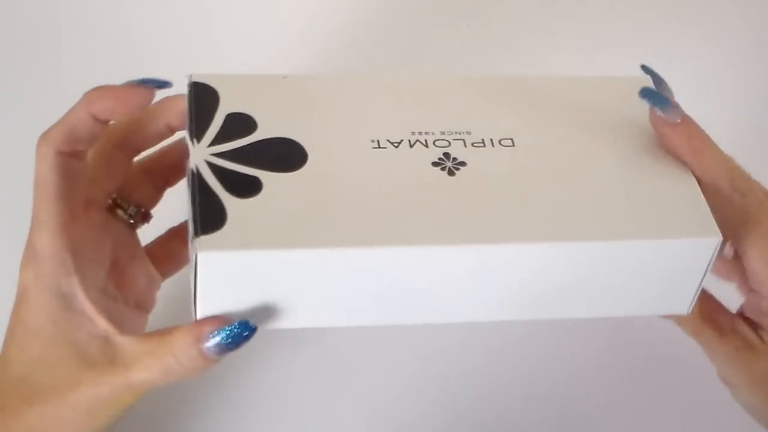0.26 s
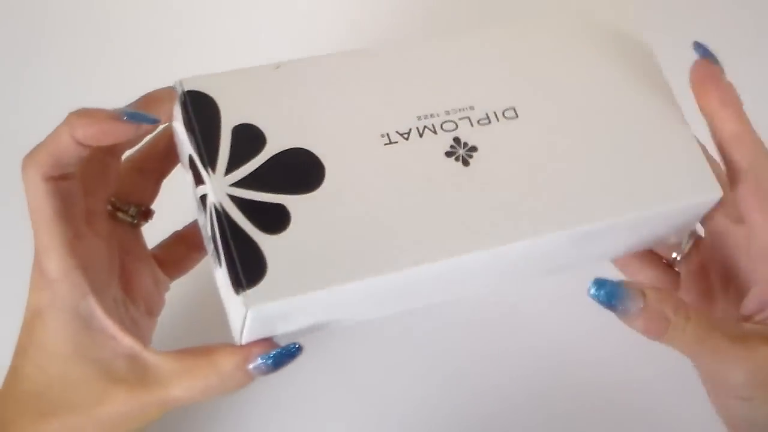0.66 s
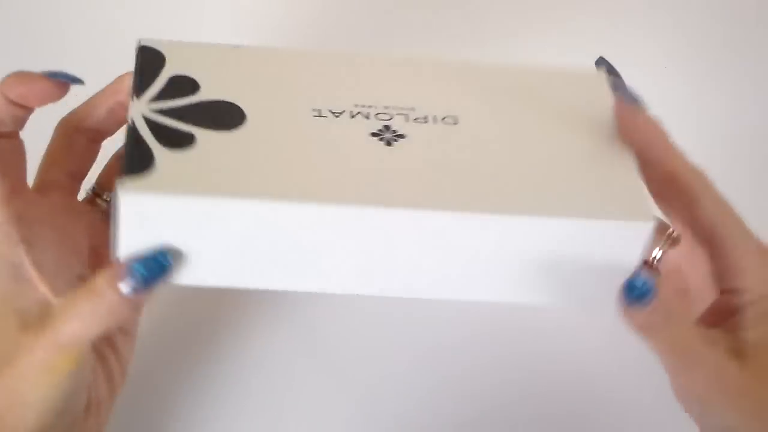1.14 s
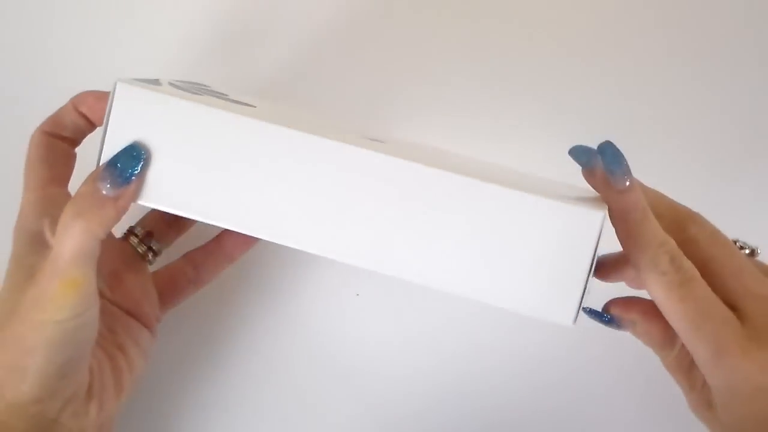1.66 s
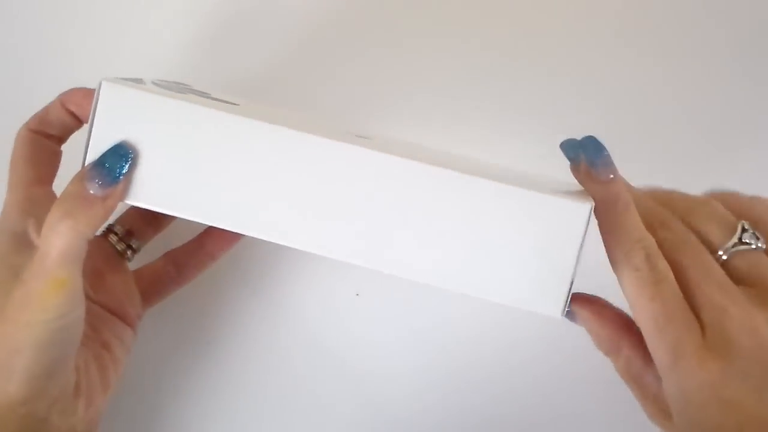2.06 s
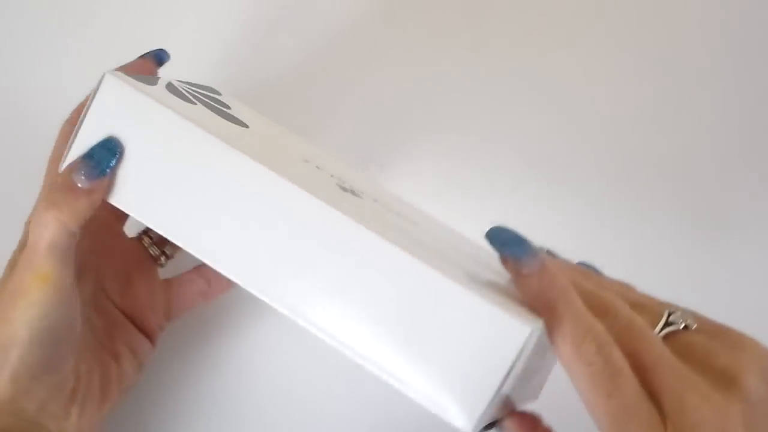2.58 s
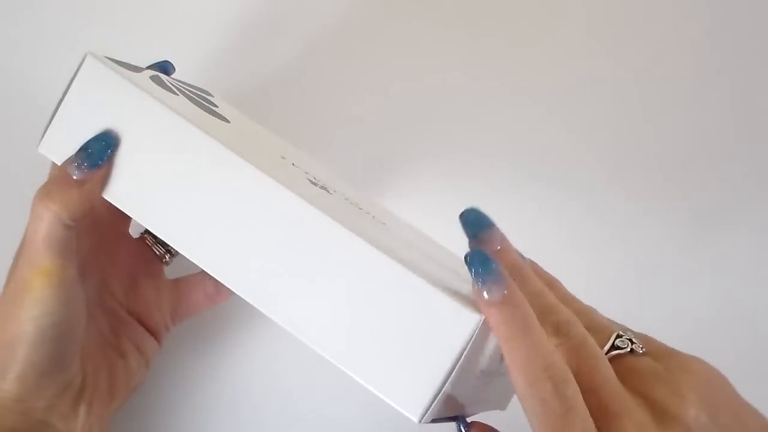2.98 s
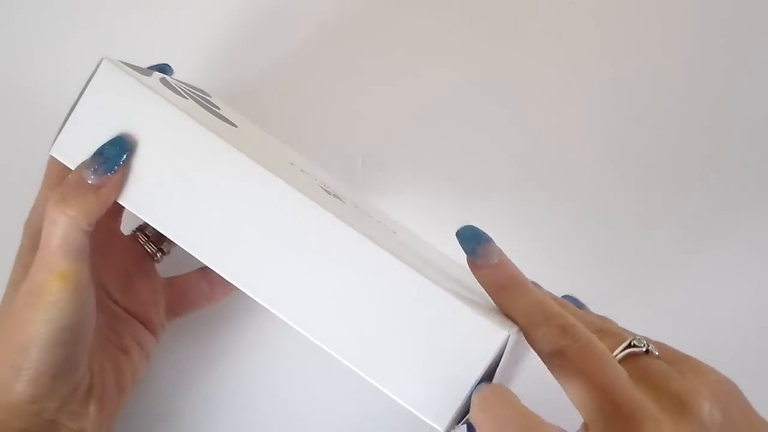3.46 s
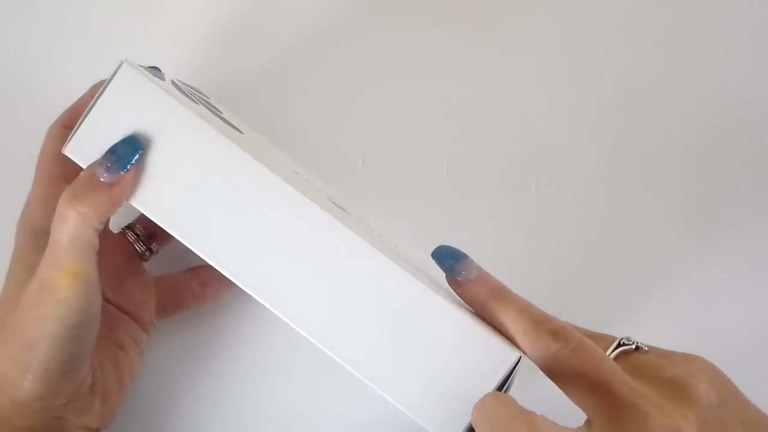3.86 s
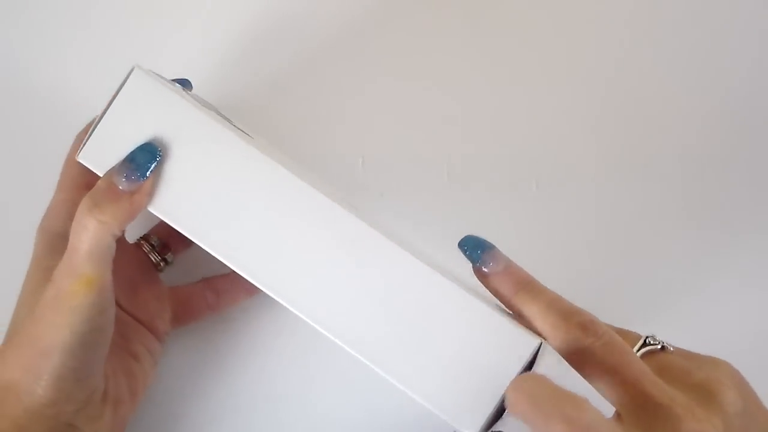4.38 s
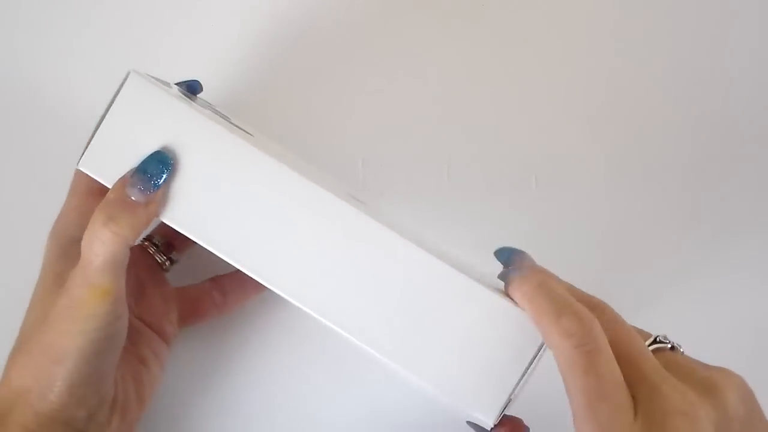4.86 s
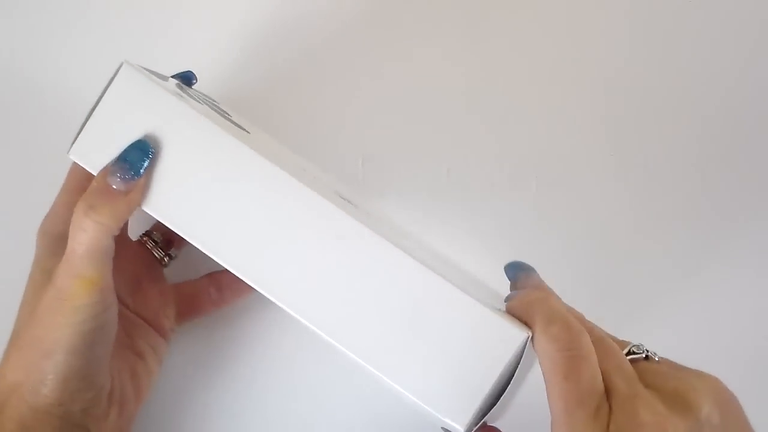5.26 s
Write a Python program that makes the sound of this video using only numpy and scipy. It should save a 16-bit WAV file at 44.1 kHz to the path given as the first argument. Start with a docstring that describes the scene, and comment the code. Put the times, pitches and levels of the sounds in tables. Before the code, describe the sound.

A stiff hollow card box is handled close to a stereo microphone in a small quiet room. Faint nail ticks and soft skin rubs begin sparsely, with a clear click at about 0.55 s and a sharper, hollower one near 1.36 s. From 1.5 to 2.4 s there are mostly faint touches and soft low finger thumps. Two strong papery snaps follow at 2.5 and 2.6 s, then light rubbing. At about 3.42 s the flap pops loose with a quick double, hollow clack. Clicks resume at 3.9 s and cluster between 4.3 and 4.65 s. From 4.73 to 4.95 s the flap is prised in a dense crackle with two very short creaks, peaking in the loudest, sharp snap at 4.91 s. Thin ticks, lower snaps and rubs continue to the end, notably at 5.4 s. Reflections are short; faint hiss and a low wavering hum lie beneath.

```python
"""In a small room, a stiff card box is held close to a pair of microphones while long nails tap it and pick at its flap.
Each contact is a noise burst through card and wall resonances, with a thump from decaying modes of the hollow box.
Rubbing skin is noise with tiny catches; the flap pops loose, and uneven pulses make it creak as it is prised open.
A gain control turns loud snaps down and recovers slowly; steady noise and a low wavering hum lie beneath."""
import sys
import numpy as np
from scipy import signal
from scipy.fft import rfft, irfft, next_fast_len
from scipy.io import wavfile
from scipy.ndimage import uniform_filter1d, minimum_filter1d

SR = 44100
rng = np.random.default_rng(int(sys.argv[2]) if len(sys.argv) > 2 else 0)


def put_to_file(sound):
    """Save the sound as 16-bit audio at rate SR, in the file named by the first command-line argument."""
    columns = np.atleast_2d(sound).T  # one column per channel
    safe = np.clip(columns, -1, 1)
    whole_steps = np.round(safe * 32767)
    wavfile.write(sys.argv[1], SR, whole_steps.astype(np.int16))


N = 243873
T = np.arange(N) / SR  # time [s]

# nail taps and snaps of the card: (time [s], strength [dB], ring [Hz],
# hollow thump re strength [dB], sharp edge re strength [dB])
TAPS = [(0.2533, -47.5, 2820, 5, -4), (0.269, -50.5, 2660, -8, -12), (0.4023, -49, 3250, -26, -12),
        (.5490, -30, 2730, -11, -11.5), (0.7965, -42, 2780, -14, -8), (1.072, -51.5, 2380, -24, -21),
        (1.202, -40, 2800, -28, -16), (1.2086, -43.5, 3100, -18, -19), (1.306, -40.5, 2700, -5.5, -28),
        (1.3604, -31.5, 3000, -1, -0.5), (1.4655, -47.5, 2480, -9, -10), (1.526, -46, 2320, -8, -21),
        (1.6125, -50.5, 1830, -13, -16), (1.9984, -51, 3320, -8, -9), (2.0704, -51, 3000, -16, -29),
        (2.3428, -44, 2860, -7.5, -5.5), (2.393, -51.5, 2880, 1.5, -19), (2.509, -24.5, 2230, -15, -6.5),
        (2.6067, -29, 2090, -13, -8.5), (2.9344, -39, 1930, -12, -23), (2.967, -49, 2940, -2.5, 0),
        (3.1043, -47, 3700, -8, -5), (3.3112, -36, 2650, -11.5, -5.5), (3.421, -28.5, 2690, -4.5, -8),
        (3.8389, -41.5, 2840, -12, -15.5), (3.9349, -33, 3650, -13, -7), (4.0272, -43.5, 2270, -11, -10),
        (4.0407, -45, 2500, -5, -10), (4.28, -33, 2970, -13.5, -10.5), (4.3636, -31.5, 2800, -8.5, -11.5),
        (4.3902, -37, 2680, -8.5, -14), (4.4337, -33.5, 3780, -13, -8.5), (4.5248, -31, 3380, -14.5, -8.5),
        (4.6331, -37.5, 2850, -10.5, -7), (4.7549, -31, 2610, -25, -11.5), (4.763, -35, 2490, -9, -9),
        (4.7882, -38, 2950, -6.5, -8), (4.8005, -37.5, 3440, -20, -1.5), (4.8065, -44, 3480, -12, 7.5),
        (4.8543, -35.5, 1550, -5.5, -5), (4.8660, -31.5, 1500, -20.5, -7.5), (4.8718, -45, 1690, -3, -2),
        (4.9034, -33.5, 3540, -34, -12), (4.9093, -16.5, 2260, -26, -9), (4.9186, -31.5, 3300, -5.5, -1.5),
        (5.0568, -43.5, 2725, -22, 0), (5.0616, -41.5, 1700, 3, -6), (5.081, -35, 3520, -30, -5),
        (5.0914, -37.5, 3460, -19, -6), (5.107, -42, 3460, -30, -2), (5.171, -42, 3520, -20, -2.5),
        (5.2316, -37, 3420, -32, 0), (5.2415, -33.5, 1560, -17, -8), (5.34, -45.5, 1600, 3, -16),
        (5.3473, -43, 1800, 2, -12), (5.3703, -39, 2500, -10, -10), (5.381, -39, 3000, -11, -8),
        (5.396, -26.5, 1470, -12.5, -10.5), (5.4369, -29, 1730, -30, -4.5), (5.4797, -37.5, 1700, -10, -15),
        (5.4938, -41, 2400, -14, -19), (5.5002, -42.5, 2320, -6, -18)]
# soft finger pads landing on the box: (time [s], relative level [dB], pitch [Hz])
PADS = [(0.244, -64, 356), (0.549, -54, 197), (1.492, -47, 367), (2.015, -49, 397), (2.487, -63, 334),
        (2.854, -48, 357), (3.424, -46.5, 257), (4.034, -47, 160), (4.07, -44.5, 151.5), (5.058, -51, 360)]
# a finger rubs along the card: (time [s], length [s], relative level [dB],
# hiss re that level [dB], pitch of the card under the finger [Hz])
RUBS = [(0, 0.033, -57.5, 2, 2980), (0.252, 0.067, -60, -0.5, 2700), (0.423, 0.054, -51.5, -11, 2600),
        (0.512, 0.098, -54.5, -9, 2300), (0.735, 0.16, -58.5, -10, 2660), (1.152, 0.048, -49, -10.5, 1550),
        (1.207, 0.048, -48, -2, 3000), (1.267, 0.14, -55.5, 0.5, 2630), (1.481, 0.067, -54.5, -10, 2400),
        (1.615, 0.04, -57, -11, 1900), (1.744, 0.016, -60, -15, 2570), (2.001, 0.061, -61.5, -21, 2960),
        (2.321, 0.086, -57, -8, 2970), (2.481, .03, -57, -7, 2600), (2.547, 0.17, -55.5, -7, 2600),
        (2.78, 0.092, -57, 0.5, 3540), (3.146, 0.052, -57.5, -8, 2800), (3.293, 0.25, -54, -6, 2820),
        (3.554, 0.21, -56.5, -10, 1880), (4.028, .03, -48.5, -18, 2260), (4.316, .05, -57, -12, 2800),
        (4.508, .11, -53, -8, 2750), (4.753, 0.094, -44, -11, 2580), (4.86, 0.054, -46, -9, 1500),
        (5.077, .05, -47.5, 1, 3400), (5.244, 0.039, -39, -13, 1490), (5.383, 0.13, -46, -15.5, 1540)]
# the flap springs loose and slaps back: (time [s], level [dB])
FLAP_POPS = [(3.423, -31.5), (3.4387, -35)]
# the tight flap sticks and slips: (time [s], time until it gives [s], initial slip rate [Hz], level [dB])
CREAKS = [(4.729, .024, 904.5, -34), (4.8474, .021, 478, -36)]
# modes of the hollow box: (frequency [Hz], relative level [dB], t60 [s])
BOX_MODES = [(223, -16, 0.13), (276, -39, 0.02), (357, 14.5, 0.059), (421.9, 9, 0.11), (518, -6.5, 0.21)]
# modes of the flap: (frequency [Hz], relative level [dB], t60 [s])
FLAP_MODES = [(172, -30, .25), (206, -6, 0.45), (355, -11, 0.25), (473, -19, 0.049), (520, 2, 0.12),
              (573, -1, 0.061), (612, 9.5, 0.17), (680, 8, 0.074), (835, -7, 0.11), (930, -4, 0.15),
              (1137, 2, 0.048), (1430, -10, .1)]
# bending resonances of the walls: (frequency [Hz], width [Hz], relative level [dB])
WALL_MODES = [(528, 59, -1.5), (750, 66, 0.5), (937, 180, -1.5), (1130, 176, 1.5), (1271, 130, -1),
              (1497, 160, 0.5)]
# stiff ripples of the card near its folds: (frequency [Hz], width [Hz], relative level [dB])
FOLD_MODES = [(2327, 100, -0.5), (2595, 73, 3), (2820, 27, -6), (3420, 82, -8.5), (4016, 55, 2)]
# resonances of the lifted flap: (frequency [Hz], width [Hz], relative level [dB])
LIFTED_MODES = [(875, 400, -9.5), (1430, 130, 3), (1630, 160, 1.5), (2680, 200, -0.5), (3020, 590, -6.5)]
# spectrum of the cracking card: (frequency [Hz], relative level [dB])
CARD_SPECTRUM = [(700, -11.5), (1300, 1.5), (1800, 6), (2600, 2.5), (3700, 5), (4600, -3.5), (6000, -4),
                 (14000, -39.5)]
# spectrum of the sharp nail edge: (frequency [Hz], relative level [dB])
EDGE_SPECTRUM = [(2500, -66), (4500, 2.5), (5500, 1), (7500, -1.5), (9000, -2.5), (10500, -3),
                 (14000, -9.5)]
# spectrum of sliding skin: (frequency [Hz], relative level [dB])
SKIN_SPECTRUM = [(300, -39), (700, -1), (1100, -8), (1600, -0.5), (2200, -1), (3000, 5), (4000, 2.5),
                 (5500, 0), (8000, -9), (14000, -49)]
# spectrum of the rubbing hiss: (frequency [Hz], relative level [dB])
HISS_SPECTRUM = [(2500, -6.5), (5000, 8.5), (7000, 6), (11000, 2), (14000, -2.5)]
# spectrum of the room's reflections: (frequency [Hz], relative level [dB])
ROOM_SPECTRUM = [(100, -14.5), (350, 3.5), (800, 1.5), (1500, -1.5), (3000, -6.5), (6000, -1.5),
                 (14000, -3)]
# spectrum of the steady background noise: (frequency [Hz], relative level [dB])
FLOOR_SPECTRUM = [(20, -4), (36, -8.5), (70, -11.5), (110, -16), (148, -9.5), (190, -13.5), (270, -17),
                  (350, -24), (430, -21.5), (520, -17.5), (700, -24.5), (1000, -25.5), (1300, -27),
                  (2200, -27.5), (3000, -28), (4600, -31), (14000, -36)]
# low hum: (frequency [Hz], rms level [dB])
HUM = [(26.2, -58.5), (50, -65.5)]

LIFTED_S = 4.7  # from this time the flap stands free
# wall flex re strength; a lower ring comes from further inside a wall and bends it more
FLEX_SHUT_DB, FLEX_LIFTED_DB, FLEX_DB_PER_OCTAVE, FLEX_REF_HZ = -9.5, -6, -2, 2700
# the card's second bending mode: ratio to the ring pitch, level, t60 as the finger damps it
OVERTONE_RATIO, OVERTONE_DB, OVERTONE_T60_S = 1.584, -2.5, 0.051
# a glancing nail has less edge, stays longer on the card and rings it more purely:
# edge of a square hit, and the fall of edge that doubles both
SQUARE_EDGE_DB, GLANCE_DB = -10.5, 11
TICK_DB, TICK_SCATTER_DB = -6.5, 0.5  # faint nail tick in each rub: level re the rub, scatter
RUB_ATTACK_S, RUB_RELEASE_S = 0.0085, 0.013  # linear rise; time constant of the fade
RUB_RING_SHARE, RUB_RING_WIDTH_HZ = 0.44, 730  # the card's ring under the rubbing finger
HOLD_DB, HOLD_HISS_DB = -65, -5.5  # the holding hand never rests: relative level; its hiss re that level
RUB_DRUM_DB, HOLD_DRUM_DB = -7.5, -1.5  # drumming of the box re the friction
CREAK_ATTACK_S, CREAK_RELEASE_S = .007, 0.012  # time constants
CREAK_SAG = 0.39  # share of the slip rate that is lost as the flap gives
CREAK_TOP_HZ = 4200  # the rounded slips carry little above this
LIMIT_DB, TOP_HZ = -11.5, 14250  # gain control threshold; upper band limit


def taps():
    """Impact excitation: clear taps and snaps, and a faint nail tick somewhere in each rub."""
    out = np.zeros(N)
    for s, db, ring_hz, thump_db, edge_db in TAPS:
        add(out, s, undb(db) * contact(s, ring_hz, thump_db, edge_db))
    for start, length, db, _, ring_hz in RUBS:
        s = start + length * rng.random()
        tick_db = db + TICK_DB + TICK_SCATTER_DB * rng.standard_normal()
        add(out, s, undb(tick_db) * contact(s, ring_hz, thump_db=-16, edge_db=1))
    return out


def contact(s, ring_hz, thump_db, edge_db, flap_share=0.44):
    """Superposition: a contact rings the card near the nail, flexes the walls and thumps the air inside."""
    glance = 2 ** (max(SQUARE_EDGE_DB - edge_db, 0) / GLANCE_DB)
    burst = crack(t60=0.0089 * glance, linger_db=-30.0, linger_t60=.15, rise_s=0.00085)
    card = folds(colour(burst, CARD_SPECTRUM))
    overtone = resonate(card, ring_hz * OVERTONE_RATIO, width_hz=270)
    overtone = overtone * undb(-60 * T[:len(card)] / OVERTONE_T60_S)
    card = 0.57 / glance * card + resonate(card, ring_hz, width_hz=730) + undb(OVERTONE_DB) * overtone

    flex = walls(crack(t60=0.0055, linger_db=-25, linger_t60=0.094, rise_s=0.00051))
    flex_db = FLEX_SHUT_DB
    if s > LIFTED_S:  # the free flap rings along
        card = card + 0.53 * lifted(card)
        flex = flex + flap_share * lifted(flex)
        flex_db = FLEX_LIFTED_DB
    flex_db = flex_db + FLEX_DB_PER_OCTAVE * np.log2(ring_hz / FLEX_REF_HZ)

    edge = colour(crack(t60=0.0054, linger_db=-24, linger_t60=0.084, rise_s=0.00054), EDGE_SPECTRUM)
    thump = ring(BOX_MODES, scatter=0.022)
    return blow(card) + undb(flex_db) * blow(flex) + undb(edge_db) * blow(edge) + undb(thump_db) * thump


def crack(t60, linger_db, linger_t60, rise_s):
    """Scattering of bending waves in the card: a dense burst with a weaker shiver that outlasts it."""
    t = T[:SR // 4]
    decay = undb(-60 * t / t60) + undb(linger_db - 60 * t / linger_t60)
    envelope = (1 - np.exp(-t / rise_s)) * decay
    return even(rng.choice([-1, 1], len(t)) * envelope)


def folds(x, share=0.72):
    """Local resonance: the folds add narrow rings to a sound that passes through the card."""
    return x + share * sum(undb(db) * resonate(x, hz, width) for hz, width, db in FOLD_MODES)


def walls(x):
    """Plate resonance: bending modes of the card walls, with alternating sign."""
    return sum((-1) ** k * undb(db) * resonate(x, hz, width) for k, (hz, width, db) in enumerate(WALL_MODES))


def lifted(x):
    """Resonance of a free plate: the flap once it stands open."""
    return sum(undb(db) * resonate(x, hz, width) for hz, width, db in LIFTED_MODES)


def ring(modes, scatter):
    """Modal decay: fading sines; the grip shifts their pitch a little at every blow."""
    t = T[:SR // 4]
    out = np.zeros(len(t))
    for hz, db, t60 in modes:
        shifted_hz = hz * (1 + scatter * rng.standard_normal())
        out += undb(db - 60 * t / t60) * np.sin(2 * np.pi * shifted_hz * t)
    return blow(out)


def flap():
    """Sudden release and stick-slip: the flap pops loose, then creaks as it is prised open."""
    out = np.zeros(N)
    for s, pop_db in FLAP_POPS:
        clatter = blow(walls(crack(t60=0.031, linger_db=-9, linger_t60=0.13, rise_s=0.001)))
        add(out, s, undb(pop_db) * (ring(FLAP_MODES, scatter=0.0061) + 0.64 * clatter))
    for s, gives_s, slip_hz, db in CREAKS:
        add(out, s, undb(db) * creak(gives_s, slip_hz))
    return out


def creak(gives_s, slip_hz):
    """Stick-slip: slips of card on card ring the flap; they swell, then slow down and fade as it gives."""
    t = T[:SR // 8]
    hz = slip_hz * (1 - CREAK_SAG * (1 - 1 / (1 + (t / gives_s) ** 4.5)))
    envelope = (1 - np.exp(-t / CREAK_ATTACK_S)) * np.exp(-np.maximum(t - gives_s, 0) / CREAK_RELEASE_S)
    jitter = unit(uniform_filter1d(rng.standard_normal(len(t)), size=60))
    # the slower the slips, the less regular they are
    unevenness = np.clip(.05 + .7 * (1 - hz / 900), 0, .25)
    cycles = np.cumsum(hz * (1 + unevenness * jitter)) / SR
    slips = np.diff(np.floor(cycles), prepend=0)  # one pulse per whole cycle
    slips = slips * undb(2.4 * rng.standard_normal(len(t)))
    slips = signal.sosfilt(signal.butter(2, CREAK_TOP_HZ, fs=SR, output="sos"), slips)
    return envelope * unit(unit(lifted(slips)) + 0.36 * unit(walls(slips)))


def slide():
    """Dry friction: skin makes a smooth hiss with tiny catches, which ring the card and drum on the box."""
    catch_rate_hz, spread_db = 260, 4.5
    struck = (rng.random(N) < catch_rate_hz / SR) * rng.choice([-1, 1], N)
    catches = struck * undb(spread_db * np.minimum(rng.exponential(size=N), 3))
    snag = crack(t60=0.017, linger_db=-33, linger_t60=0.039, rise_s=0.0008)
    catches = unit(signal.fftconvolve(catches, snag)[:N])
    smooth = rng.standard_normal(N)
    # the finger grips and lets go many times a second
    grip = undb(1.3 * unit(signal.resample(rng.standard_normal(size=360), N)))
    friction = (smooth + catches) * grip

    drum = sum(undb(mode_db) * resonate(friction, hz, width_hz=91) for hz, mode_db, _ in BOX_MODES)
    drum = unit(unit(drum) + 1.01 * unit(walls(friction)))
    hiss = unit(colour(smooth + 0.82 * catches, HISS_SPECTRUM))
    skin = unit(folds(colour(friction, SKIN_SPECTRUM)))

    out = undb(HOLD_DB) * (0.66 * skin + undb(HOLD_HISS_DB) * hiss + undb(HOLD_DRUM_DB) * drum)
    for envelope, (_, _, _, hiss_db, hz) in zip(rubbing(), RUBS):
        card = RUB_RING_SHARE * unit(resonate(friction, hz, RUB_RING_WIDTH_HZ))
        rub = 0.47 * skin + card + undb(hiss_db) * hiss + undb(RUB_DRUM_DB) * drum
        out = out + 0.63 * envelope * rub
    return out


def rubbing():
    """Amplitude envelope of each rub: linear rise, hold and exponential fade."""
    envelopes = []
    for s, length, db, _, _ in RUBS:
        rise = np.clip((T - s) / RUB_ATTACK_S, 0, 1)
        fade = np.exp(-np.clip(T - s - length, 0, 1) / RUB_RELEASE_S)
        envelopes.append(undb(db) * rise * fade)
    return envelopes


def pads(rise_s=0.0044, t60=0.072):
    """Slow excitation: soft flesh pushes slowly, so only one low mode answers."""
    out, t = np.zeros(N), T[:SR // 4]
    for s, db, hz in PADS:
        envelope = undb(db - 60 * t / t60) * (1 - np.exp(-t / rise_s))
        add(out, s, envelope * 2 * np.sin(2 * np.pi * hz * t))
    return out


def room(x, t60=0.29, tail_db=-11, early_t60=0.13, early_db=-10, delay_s=0.0046, right_db=1.06,
         table_s=0.0059, table_db=-16):
    """Reflection and reverberation: the table top gives one echo while the small room dies away."""
    t = T[:SR // 2]
    fields = []
    for _ in range(2):
        early, tail = (even(rng.standard_normal(len(t)) * undb(-60 * t / decay) * (t > delay_s))
                       for decay in (early_t60, t60))
        early = undb(early_db) * early / np.linalg.norm(early)
        tail = undb(tail_db) * tail / np.linalg.norm(tail)
        fields.append(colour(early + tail, ROOM_SPECTRUM))
    # short waves leave the box differently towards each port
    near = even(rng.standard_normal(len(t)) * undb(-60 * t / 0.0073) * (t > .0003))
    near = near / np.linalg.norm(near)
    near = signal.sosfilt(signal.butter(2, 5000, "high", fs=SR, output="sos"), near)
    response = diffuse(fields[0], fields[1] + 0.7 * near, wide_hz=4230, bass_width=.07)
    response[:, 0] += 1  # direct sound
    response[:, int(table_s * SR)] += undb(table_db)
    balance = undb(np.array([[-right_db], [right_db]]) / 2)
    return signal.fftconvolve(x[None], response, axes=1)[:, :N] * balance


def diffuse(mid, side, wide_hz, bass_width):
    """Spatial coherence: two close microphone ports hear more alike in the bass than in the treble."""
    treble = signal.sosfilt(signal.butter(1, wide_hz, "high", fs=SR, output="sos"), side)
    side = bass_width * side + (1 - bass_width) * treble
    return np.array([mid + side, mid - side])


def background(floor_db=-58.0, waver=0.22):
    """Stationary noise and amplitude modulation: room noise and microphone hiss over a wavering low hum."""
    mid, side = (unit(colour(rng.standard_normal(N), FLOOR_SPECTRUM)) for _ in range(2))
    hum = 0
    for hz, db in HUM:
        swell = 1 + waver * unit(signal.resample(rng.standard_normal(size=40), N))
        hum = hum + undb(db) * unit(swell * np.sin(2 * np.pi * (hz * T + rng.random())))
    return undb(floor_db) * diffuse(mid, side, wide_hz=4230, bass_width=0.69) + hum


def undb(db):
    """Logarithmic level: decibels to amplitude gain."""
    return 10 ** (np.asarray(db) / 20)


def unit(x):
    """Power normalisation: scale to rms 1."""
    return x / np.sqrt(np.mean(x ** 2))


def blow(x):
    """Energy normalisation: scale a short sound to the energy of 5 ms at rms 1."""
    return x / np.sqrt(np.sum(x ** 2) / (.005 * SR))


def add(track, s, sound):
    """Superposition: mix a sound into a track at time s."""
    i = max(int(s * SR), 0)
    track[i:i + len(sound)] += sound[:max(N - i, 0)]


def colour(x, points):
    """Minimum-phase filtering: a causal filter through (frequency [Hz], level [dB]) points."""
    size = next_fast_len(len(x) + 4096, real=True) * 2
    hz, db = np.transpose(points)
    f = np.arange(size // 2 + 1) * SR / size
    cepstrum = irfft(np.log(undb(np.interp(np.log(f + 1), np.log(hz), db))))
    # folding the cepstrum onto positive time makes the filter causal
    cepstrum[1:size // 2] *= 2
    cepstrum[size // 2 + 1:] = 0
    return irfft(rfft(x, size) * np.exp(rfft(cepstrum)))[:len(x)]


def resonate(x, hz, width_hz):
    """Simple resonance: one band-pass peak with gain 1 at its centre."""
    return signal.lfilter(*signal.iirpeak(hz, hz / width_hz, fs=SR), x)


def even(x, size=288):
    """Spectral whitening: spread a burst's energy evenly over all pitches."""
    spectrum = rfft(x, len(x) * 2)
    power = uniform_filter1d(np.abs(spectrum) ** 2, size=size)
    return irfft(spectrum / np.sqrt(power + 1e-12))[:len(x)]


def scene(bass_cut_hz=140):
    """Radiation efficiency: the box in the room is too small to give off deep bass."""
    box = taps() + flap() + pads() + slide()
    box = signal.sosfilt(signal.butter(2, bass_cut_hz, "high", fs=SR, output="sos"), box)
    return room(box) + background()


def record(dry, recover_db_per_s=9):
    """Peak limiting: gain drops at once on a loud snap and creeps back; the top is cut."""
    peak_db = 20 * np.log10(np.abs(dry).max(axis=0) + 1e-9)
    excess_db = np.maximum(peak_db - LIMIT_DB, 0)
    # hold the largest excess so far, less its steady recovery
    cut_db = np.maximum.accumulate(excess_db + recover_db_per_s * T) - recover_db_per_s * T
    gain = uniform_filter1d(minimum_filter1d(undb(-cut_db), size=88), size=44)
    return signal.sosfilt(signal.ellip(8, .2, 70, TOP_HZ, fs=SR, output="sos"), dry * gain)


dry = scene()
out = record(dry)
put_to_file(out)
```